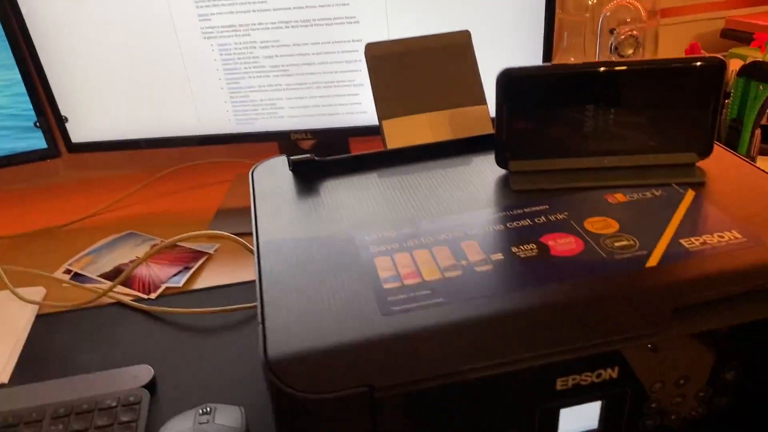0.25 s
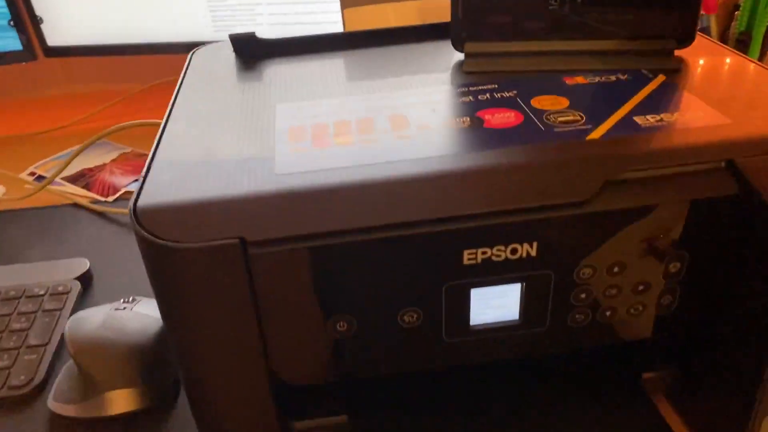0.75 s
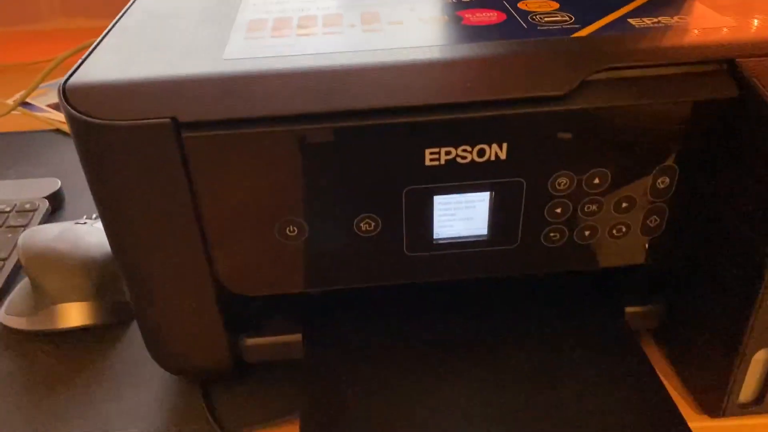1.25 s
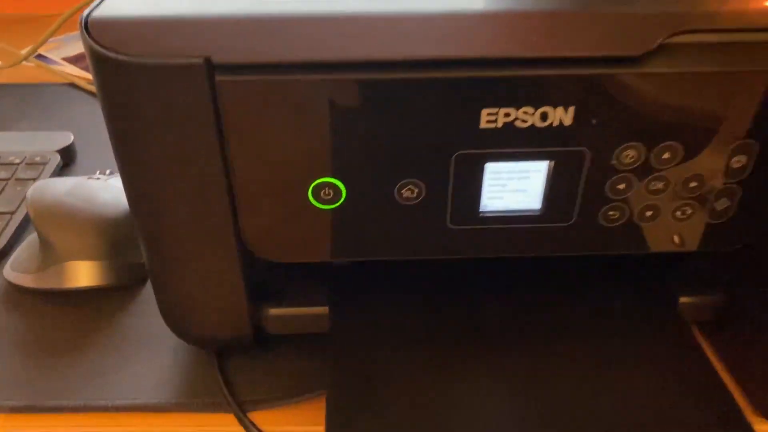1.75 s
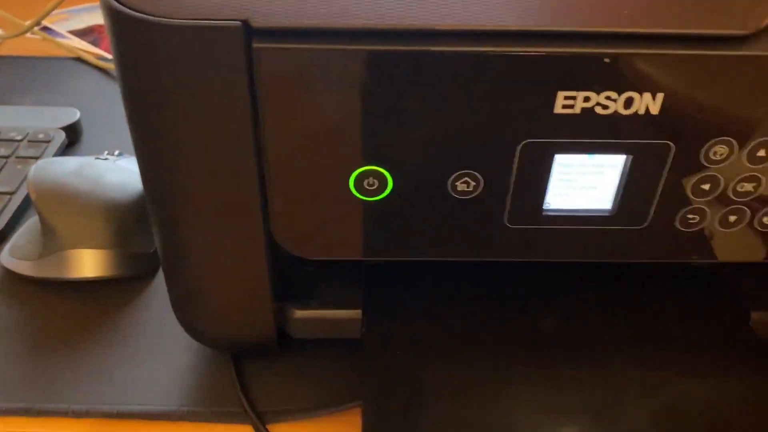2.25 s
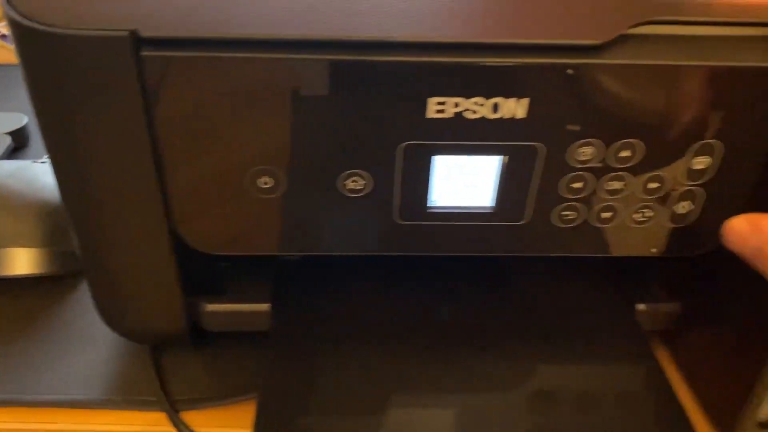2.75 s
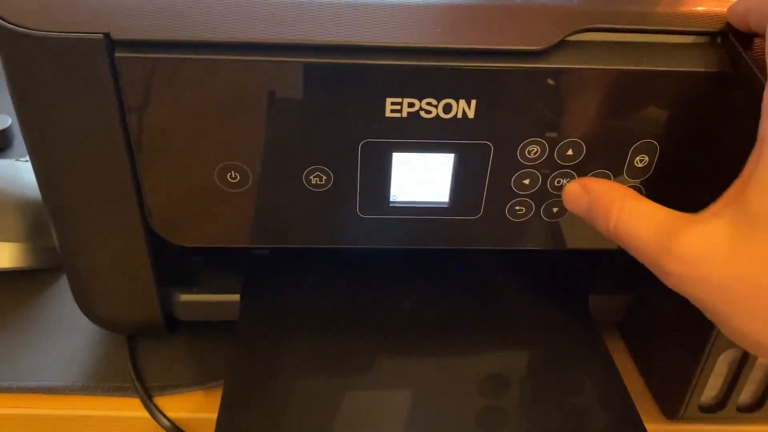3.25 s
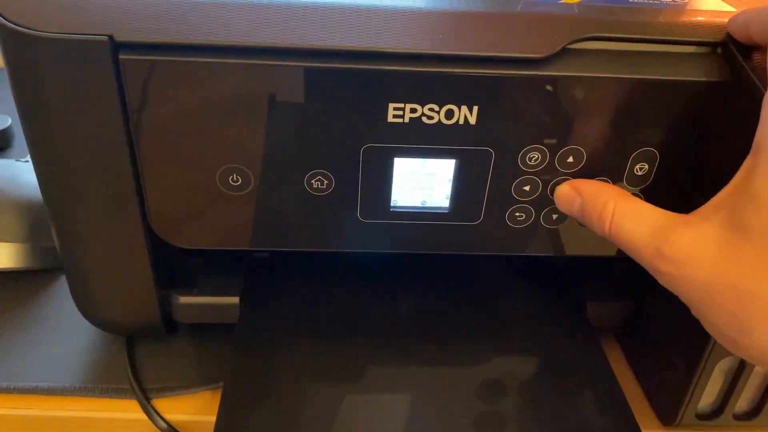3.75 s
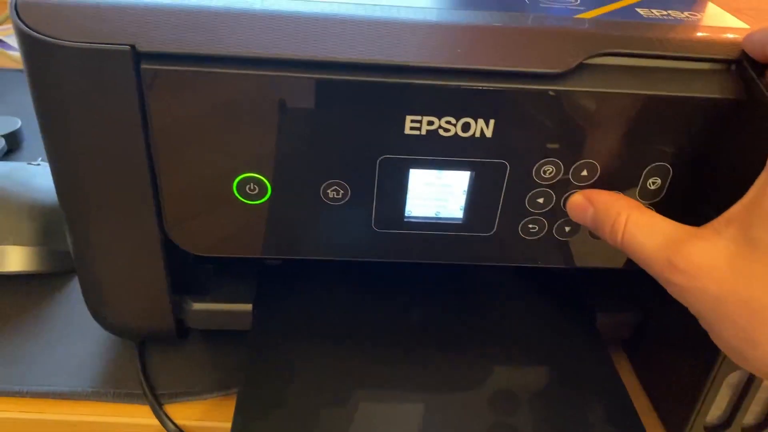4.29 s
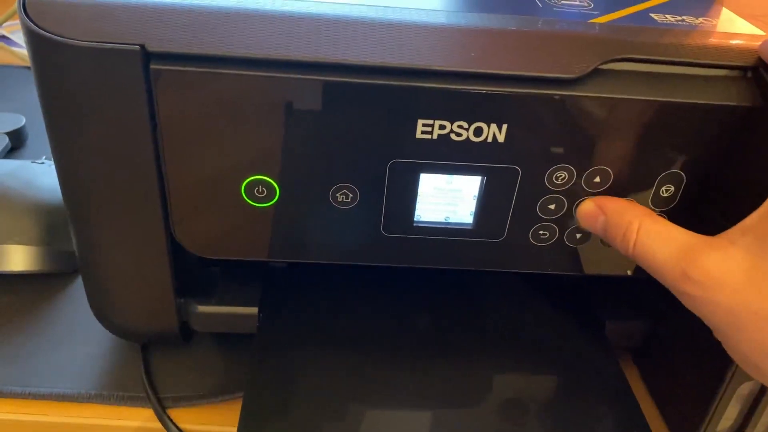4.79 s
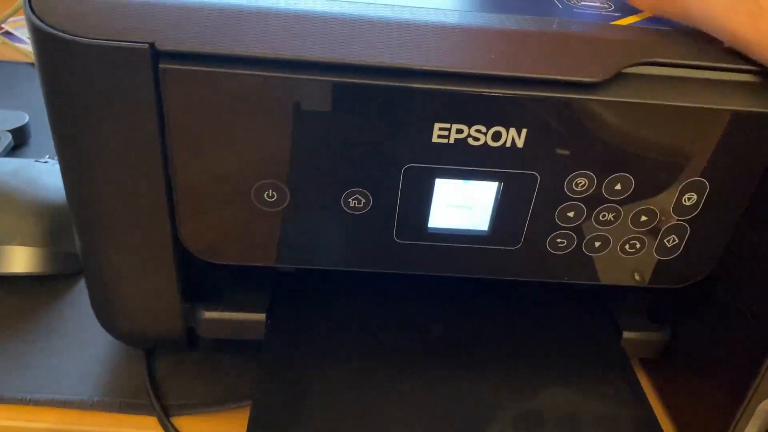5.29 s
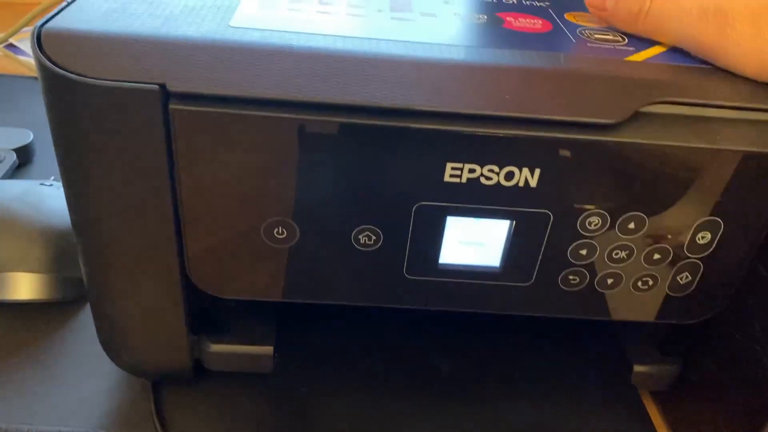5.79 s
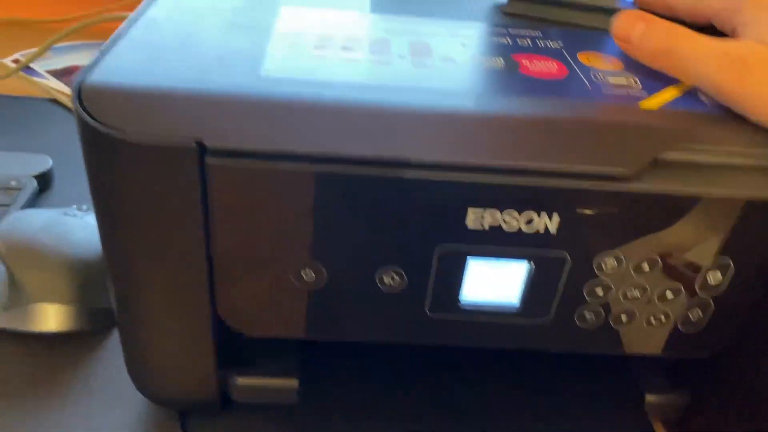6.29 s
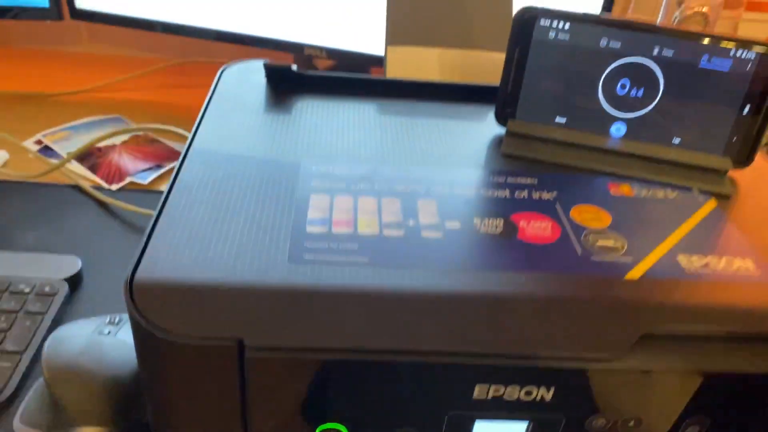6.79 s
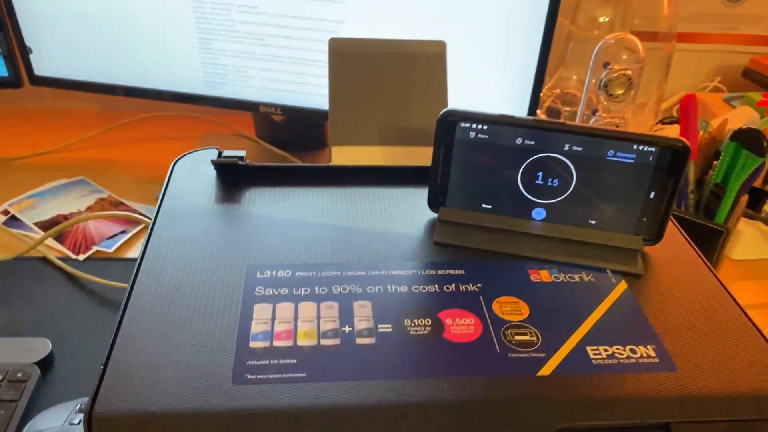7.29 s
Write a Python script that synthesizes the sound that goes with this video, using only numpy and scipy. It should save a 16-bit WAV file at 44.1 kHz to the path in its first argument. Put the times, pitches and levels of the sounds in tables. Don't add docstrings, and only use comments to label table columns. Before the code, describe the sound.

A hand-held phone microphone near a printer catches three bursts of mechanism noise separated by calm. The first is a short hollow rattle; then soft sleeve brushing and snapping panel buttons. The second opens with a hard latch crack and fades through gear grind into a faint very high whine. Finally a low whir rises and heavy plastic knocks, bright cracks and scraping crowd together. Low fan-like hum throughout, short dry room echo.

```python
import sys
import numpy as np
from scipy import signal
from scipy.fft import rfft, irfft
from scipy.io import wavfile

SR = 44100
rng = np.random.default_rng(int(sys.argv[2]) if len(sys.argv) > 2 else 0)


def voltage_ratio(level):
    return 10 ** (np.asarray(level, float) / 20)


def put_to_file(sound):
    columns = np.atleast_2d(sound).T
    safe = np.clip(columns, -1, 1)
    whole_steps = np.round(safe * 32767)
    wavfile.write(sys.argv[1], SR, whole_steps.astype(np.int16))


N = 332514
HZ = np.fft.rfftfreq(N, 1 / SR)

# (frequency [Hz], width [Hz], level [dB])
CASE_MODES = [(289.6, 24, 13.5), (385, 28, 8.5), (565, 66, 13), (700, 76, 13.5), (748, 49, 8),
              (1073, 40, 7.5), (1290, 42, 10), (1750, 40, 1.5), (1975, 29, 1.5), (2400, 66, -5),
              (2860, 49, -7.5), (3230, 58, -6), (3480, 70, -6.5)]


def read(points, hz):
    f, value = np.transpose(points)
    return np.interp(np.log(hz + 1), np.log(f + 1), value)


def evened(x):
    return x / np.sqrt(np.mean(x ** 2) + 1e-20)


def coloured(x, points):
    return evened(irfft(rfft(x) * voltage_ratio(read(points, HZ)), N))


def resonate(x, hz, width):
    return signal.lfilter(*signal.iirpeak(hz, hz / width, SR), x)


def dulled(x, hz):
    return signal.lfilter(*signal.butter(2, hz, fs=SR), x)


def impacts(per_s, spread_db):
    size = voltage_ratio(spread_db * np.minimum(rng.exponential(1, N), 4))
    struck = rng.random(N) < per_s / SR
    return evened(size * rng.standard_normal(N) * struck)


def stroke_gain(rows, rise, sag, release, column=2):
    t = np.arange(0, N, 16) / SR
    gain = 0
    for row in rows:
        start, length, db = row[:3]
        if column > 2:
            db = db + row[column]
        age = t - start
        fall = sag * np.clip(age, 0, length) + release * np.maximum(age - length, 0)
        gain = gain + voltage_ratio(db - fall) * np.clip(1 + age / rise, 0, 1) ** 2
    return np.interp(np.arange(N) / SR, t, gain)


def add(mix, s, sound):
    part = mix[round(s * SR):][:len(sound)]
    part += sound[:len(part)]


def gears():
    # (start [s], length [s], case rumble [dB], boom over it [dB], grit over it [dB])
    runs = [
        (.73, 0.13, -66.5, 4, 1.5),
        (.87, 0.2, -63, 4, 0.5),
        (5.34, 0.33, -72.5, 10, 3),
        (6.748, 0.3, -55.5, 0, -1),
    ]
    # (start [s], length [s], case rumble [dB], boom over it [dB], grit over it [dB])
    rattles = [(.63, 0.057, -46.5, 4.5, -4.5), (1.03, 0.15, -40.5, -8.5, -8), (1.19, 0.017, -48, 5, -21),
               (4.998, 0.12, -39, -4, -8.5), (5.19, 0.17, -56.5, -3, -7), (5.25, 0.019, -45, 6, -2),
               (5.63, 0.026, -62, 10, -29.5), (7.076, 0.012, -37.5, -14.5, -1.5), (7.112, 0.056, -38, 1, 0),
               (7.19, 0.2, -36, -12, -10.5), (7.278, 0.085, -34, -3.5, 0.5), (7.395, .16, -35.5, -6, -8.5)]
    load_sags = (37.2, 25, 70, 80)
    load_releases = (260, 195, 343, 400)
    # (frequency [Hz], density [dB per Hz])
    grit_colour = [(1400, -3.5), (2100, -6.5), (3300, -8), (5000, -10), (7200, -15), (9000, -13.5),
                   (16000, -39)]
    # (frequency [Hz], density [dB per Hz])
    fizz_colour = [(7500, -39), (8500, 1), (10000, -5.5), (12000, -3.5), (14500, -1.5), (16000, -15.5)]

    teeth = impacts(per_s=2600, spread_db=2.0)
    case = 0
    for hz, width, db in CASE_MODES[1:]:
        case = case + voltage_ratio(db) * resonate(teeth * rng.standard_normal(N), hz, 0.74 * width)
    case = dulled(evened(case) + 0.62 * evened(resonate(teeth, 824, 1360)), 1900)
    boom = resonate(resonate(teeth, 293.0, 138), 230, 330)
    boom = boom + 0.8 * resonate(resonate(teeth, 108, 26), 110, 42.5)
    grit = coloured(impacts(per_s=5000, spread_db=0.5), grit_colour)
    fizz = coloured(impacts(per_s=6000, spread_db=-1.0), fizz_colour)

    # (sound, level column, level when free [dB], level under load [dB]); fizz counts from the grit
    layers = [(evened(case), 2, 0, 0), (evened(boom), 3, 0, 0), (grit, 4, 0, 0), (fizz, 4, -8, -17)]
    out = np.zeros(N)
    for (layer, column, free_db, load_db), sag, release in zip(layers, load_sags, load_releases):
        free = stroke_gain(runs, rise=0.017, sag=1.9, release=440, column=column)
        loaded = stroke_gain(rattles, rise=0.005, sag=sag, release=release, column=column)
        out += layer * (voltage_ratio(free_db) * free + voltage_ratio(load_db) * loaded)
    return voltage_ratio(-3.5) * out


def treble(length, decay, rise, top_hz):
    t = np.arange(length) / SR
    band = signal.butter(1, [2200, top_hz], "bandpass", fs=SR, output="sos")
    noise = signal.sosfilt(band, rng.standard_normal(length))
    return noise * np.exp(-t / decay) * np.minimum(t / rise, 1)


def knocks():
    # (time [s], peak [dB], pitch [Hz], treble over it [dB])
    snaps = [
        (.651, -34, 640, -10),
        (4.993, -15.5, 1018, -11),
        (2.155, -59, 1490, -3.5),
        (4.932, -38.5, 694, -7),
        (5.182, -49, 1000, -22),
        (5.639, -40, 427, -24.5),
        (7.115, -23, 1290, 9.5),
        (7.304, -25.5, 670, 5),
        (7.523, -30, 535, -2.5),
    ]
    # (time [s], peak [dB], pitch [Hz], treble over it [dB])
    taps = [(.626, -35.5, 425, -11), (1.0255, -21, 1281, -6), (1.0705, -28, 1280, -0.5),
            (1.109, -36, 533, -8), (1.226, -40.5, 797, -6.5), (5.039, -25, 1274, -14),
            (5.276, -34.5, 500, -19), (5.587, -42, 800, -18), (5.649, -43, 798, -15),
            (6.748, -66.5, 614, -24), (7.0735, -20, 596, -17.5), (7.104, -22, 1290, -38),
            (7.118, -21, 665, -1.5), (7.275, -23, 775, -30), (7.291, -23, 1190, -14),
            (7.314, -27, 1080, -1), (7.422, -34, 540, -21)]
    # (time [s], peak [dB], pitch [Hz], treble over it [dB])
    jams = [
        (1.195, -35, 1060, -21),
        (5.077, -33, 1150, -7),
        (7.073, -25.5, 1180, -9),
        (7.143, -17.5, 1290, -9.5),
        (7.176, -27, 725, -4.5),
        (7.355, -24, 1290, 1),
        (7.377, -36.5, 560, 5),
    ]
    # (time [s], peak [dB], pitch [Hz], treble over it [dB])
    shoves = [(.662, -34.5, 282, -24), (.689, -36, 256, -19), (.704, -72, 225, -30), (3.308, -51, 264, -36),
              (5.157, -35, 893, -15.5), (5.238, -37, 1260, -19.5), (5.261, -30, 250, -13),
              (5.287, -60, 223, -21), (5.268, -30.5, 130, -40), (5.356, -43, 204, -11.5),
              (6.35, -52.5, 213, -20.5)]
    # (events, blow length [s], rise [s])
    kinds = [(snaps, 0.0056, 0.0043), (taps, 0.0095, 0.0014), (jams, 0.013, 0.0071), (shoves, 0.017, 0.0041)]

    out, t = np.zeros(N), np.arange(4000) / SR
    for rows, blow, rise in kinds:
        for s, db, hz, treble_db in rows:
            push = rng.standard_normal(len(t)) * np.exp(-t / blow) * np.minimum(t / rise, 1) ** 2
            case = 0
            for mode_hz, width, mode_db in CASE_MODES:
                struck = resonate(push, mode_hz * rng.uniform(0.9, 1.04), width)
                case = case + voltage_ratio(mode_db) * rng.normal() * struck
            own = evened(resonate(push, hz, 0.2 * hz))
            body = own + 0.56 * evened(case) + 0.57 * evened(resonate(push, 760, 1128))
            body = signal.lfilter(*signal.butter(2, 0.36 * hz, "high", fs=SR), dulled(body, 2600))
            crack = voltage_ratio(treble_db) * treble(len(t), 0.77 * blow, 0.064 * rise, top_hz=7260)
            add(out, s - .0008, voltage_ratio(db - 1.0) * (body / abs(body).max() + crack))
    return out


def whine():
    # (start [s], end [s], level [dB], tilt [dB per multiple], grip on loudest multiple [dB])
    holds = [
        (0, 0.537, -6, 0, 4),
        (5.695, 6.034, -6.5, 0.3, -19.5),
        (6.031, 6.388, 2, -0.3, -1.5),
        (6.38, 6.739, -0.6, 0.9, 1),
    ]
    partials = np.array([-104, -97, -103, -101, -95, -84.5, -95, -99])
    chop_hz, waver_db = 1440.5, 0.5

    out, multiples = np.zeros(N), np.arange(len(partials)) + 3
    for start, end, db, tilt_db, grip_db in holds:
        t = np.arange(0, end - start, 1 / SR)
        knots = t[::900]
        levels = partials + tilt_db * (multiples - multiples.mean())
        levels = levels + grip_db * (partials == partials.max())
        tone = 0
        for k, partial_db in zip(multiples, levels):
            waver = waver_db * np.interp(t, knots, rng.standard_normal(len(knots)))
            sine = np.sin(2 * np.pi * (chop_hz * k * t + rng.random()))
            tone = tone + voltage_ratio(db + partial_db + 13.5 + waver) * sine
        add(out, max(start, 0), tone * signal.windows.tukey(len(t), .02))
    return out


def whir():
    # (start [s], end [s], start pitch [Hz], end pitch [Hz], level [dB])
    whistles = [(.43, .54, 7700, 7300, -87), (.528, .63, 9900, 10080, -87), (5.3, 5.7, 6050, 6050, -79),
                (6.80, 6.91, 940, 1010, -64), (6.89, 7.04, 1005, 1000, -61), (6.81, 6.88, 1150, 1170, -65),
                (6.9, 6.94, 1650, 1655, -67), (6.83, 6.95, 1245, 1260, -64), (6.93, 7.04, 1140, 1120, -65),
                (6.84, 6.93, 2590, 2540, -69), (6.94, 7.04, 1920, 1900, -71), (6.84, 7.0, 1560, 1530, -71)]
    # (start [s], end [s], start pitch [Hz], end pitch [Hz], level [dB])
    murmurs = [
        (5.325, 5.595, 3480, 3495, -84),
        (5.32, 5.59, 4500, 4500, -85),
        (6.746, 6.85, 220, 340, -56),
        (6.9, 7.05, 260, 310, -55.5),
    ]
    # (start [s], end [s], start pitch [Hz], end pitch [Hz], level [dB])
    drones = [(.65, .74, 290, 250, -50), (1.05, 1.25, 255, 250, -53), (1.04, 1.2, 750, 745, -52),
              (1.04, 1.16, 565, 560, -51), (5.0, 5.05, 270, 268, -48), (5.06, 5.21, 385, 378, -47),
              (5.03, 5.16, 705, 700, -50), (7.075, 7.19, 1290, 1290, -43), (7.1, 7.25, 300, 290, -44),
              (7.285, 7.325, 290, 290, -37), (7.3, 7.42, 102, 102, -47), (7.34, 7.4, 300, 300, -45),
              (7.37, 7.54, 560, 555, -44), (7.4, 7.54, 1050, 1100, -50), (7.2, 7.26, 1650, 1650, -55)]

    out = np.zeros(N)
    for rows, width in [(whistles, 22), (murmurs, 140), (drones, 35)]:
        r = np.exp(-np.pi * width / SR)
        for start, end, from_hz, to_hz, db in rows:
            n = round((end - start) * SR)
            slow = signal.lfilter([1], [1, -r], rng.standard_normal((2, SR // 2)))
            slow = evened(slow[:, -n:])
            carrier = np.exp(2j * np.pi * np.cumsum(np.linspace(from_hz, to_hz, n)) / SR)
            tone = ((2.0 + slow[0] + 1j * slow[1]) * carrier).real
            add(out, start, voltage_ratio(db) * evened(tone) * signal.windows.tukey(n, .3))
    return out


def keys():
    # (time [s], peak [dB], pitch [Hz], treble over it [dB], ring [dB])
    clicks = [
        (2.607, -40, 1310, -13, -10.5),
        (3.548, -46, 1240, -15.5, 4),
        (3.6256, -18, 1274, -20.5, -14),
        (3.741, -27, 1140, -41, -5),
        (4.807, -22, 1290, -19, -11),
        (4.914, -26.5, 1130, -30, -5),
    ]
    # (frequency [Hz], level [dB], t60 [s])
    panel = [(294, 5, 0.036), (642, 6.5, 0.15), (897, 8.5, 0.065), (1060, -10.5, 0.034), (1290, -6, 0.1),
             (1490, -1.5, 0.032), (1656, -14, 0.055), (2100, -3.5, 0.03), (2740, -13, 0.023),
             (3460, -21, 0.03)]

    out, t = np.zeros(N), np.arange(5000) / SR
    for s, db, hz, treble_db, ring_db in clicks:
        snap = np.exp(-((t - .0016) / 0.00059) ** 2) * np.cos(2 * np.pi * hz * (t - .0017))
        shake = snap + 0.49 * rng.standard_normal(len(t)) * np.exp(-t / 0.0066) * (t > .001)
        ring = 0
        for k, (mode_hz, mode_db, t60) in enumerate(panel):
            ring = ring + (-1) ** k * voltage_ratio(mode_db) * evened(resonate(shake, mode_hz, 3.5 / t60))
        spike = np.exp(-((t - .0015) / .00004) ** 2) - np.exp(-((t - .0015) / .00012) ** 2) / 3
        tick = treble(len(t), 0.0021, 0.0008, top_hz=13000) + 0.9 * spike
        click = snap + voltage_ratio(ring_db) * ring / abs(ring).max() + voltage_ratio(treble_db + 8.0) * tick
        add(out, s, voltage_ratio(db + 2.0) * click)
    return out


def ticks():
    # (time [s], peak [dB], pitch [Hz], ring [s])
    slips = [(.632, -41, 3310, 0.0096), (0.852, -50.5, 1290, 0.042), (1.027, -22, 565, 0.028),
             (1.028, -22, 2550, 0.023), (1.076, -47, 3370, 0.018), (1.205, -25.5, 1050, 0.03),
             (2.560, -52, 900, 0.012), (2.607, -41, 2680, 0.0056), (2.608, -47, 1040, 0.061),
             (3.098, -52.5, 620, 0.083), (3.098, -52.5, 970, 0.021), (3.548, -44, 3320, 0.011),
             (3.578, -48, 700, 0.018), (4.980, -51.5, 4300, 0.0056), (5.079, -29.5, 3410, 0.0093),
             (5.178, -31, 1040, 0.027), (5.443, -45.5, 1310, 0.035), (5.567, -51, 765, 0.014),
             (6.032, -72.5, 10100, .01), (6.238, -60, 1160, 0.016), (6.354, -68, 3300, 0.0081),
             (6.475, -58.5, 1940, 0.032), (6.589, -56, 1830, 0.01), (7.146, -22.5, 3240, 0.021),
             (.63, -38, 2250, .02), (.651, -35, 1820, .02), (.652, -39, 3300, 0.017),
             (.69, -41, 1900, .015), (.918, -56, 1690, .02), (1.071, -37, 1910, .025),
             (1.071, -43, 4700, .02), (1.073, -37, 3540, .025), (1.11, -39, 3000, .012),
             (1.222, -53, 3600, .015), (1.64, -45, 170, 0.095), (1.85, -50, 222, .12),
             (2.37, -51, 217, .08), (2.565, -48.5, 230, 0.075), (2.645, -48, 220, .07),
             (3.312, -49.5, 600, 0.041), (6.36, -59, 716, 0.034), (6.815, -55, 2900, .015),
             (7.113, -25, 4800, 0.017), (7.171, -36, 9500, .015), (7.304, -24, 2400, 0.027),
             (7.354, -34, 2120, .02), (7.45, -31, 570, 0.067), (7.52, -28, 570, .05)]
    out, t = np.zeros(N), np.arange(3000) / SR
    for s, db, hz, ring in slips:
        slip = dulled(rng.standard_normal(len(t)) * np.exp(-t / .002), 1.5 * hz)
        ping = evened(resonate(slip, hz, 3.5 / ring))
        part = ping + 0.35 * evened(resonate(slip, hz, 1.1 * hz))
        add(out, s, voltage_ratio(db) * part / abs(part).max())
    return out


def brush():
    # (start [s], length [s], hiss [dB], rub over it [dB])
    strokes = [(.46, 0.059, -86, 16), (.56, 0.086, -78, 13.5), (1.7, 0.2, -91, 27),
               (2.37, 0.086, -82.5, 13.5), (2.78, 0.16, -71.5, 1), (3.135, 0.06, -70.5, -8),
               (3.25, 0.079, -67.5, -15), (5.13, 0.095, -74, 6), (5.43, 0.055, -69.5, -14.5),
               (6.46, 0.046, -84, 22), (6.56, 0.042, -76.5, 10.5)]
    # (start [s], length [s], hiss [dB], rub over it
    # [dB])
    slides = [
        (1.24, 0.2, -76, 22),
        (2.62, 0.065, -81.5, 21.7),
        (3.645, 0.088, -69, 15.4),
        (4.825, 0.079, -73, 13),
    ]
    # (frequency [Hz], density [dB per Hz])
    cloth = [(880, -34), (1500, -10), (3480, -5), (4200, -6.5), (5280, -3.5), (6370, -7), (8490, -3.5),
             (9950, -3), (12200, -6.5), (16000, -3.5)]

    hiss = coloured(impacts(per_s=29000, spread_db=-1.0), cloth)
    rub = evened(dulled(resonate(impacts(per_s=4600, spread_db=4.0), 600, 1300), 2000))
    sleeve_hiss, sleeve_rub = [stroke_gain(strokes, rise=0.079, sag=20, release=390, column=k) for k in (2, 3)]
    thumb_hiss, thumb_rub = [stroke_gain(slides, rise=0.0042, sag=170, release=1600, column=k) for k in (2, 3)]
    hissing = sleeve_hiss * hiss + thumb_hiss * evened(dulled(hiss, 8000))
    return voltage_ratio(4.0) * hissing + voltage_ratio(-5.0) * (sleeve_rub + thumb_rub) * rub


def rustle():
    # (start [s], length [s], centre [Hz], width [Hz], level [dB])
    drags = [
        (1.697, .22, 6400, 2400, -85.5),
        (2.15, .3, 4600, 1190, -93),
        (6.453, 0.19, 3700, 900, -80.5),
        (7.2, 0.099, 2150, 800, -51),
        (7.319, 0.097, 4270, 1600, -47),
        (7.424, 0.11, 1920, 910, -54),
        (0.626, 0.083, 2600, 2000, -60),
    ]
    out = np.zeros(N)
    for start, length, hz, width, db in drags:
        drag = resonate(resonate(rng.standard_normal(SR // 2), hz, width), hz, width)
        drag = drag[:round(length * SR)]
        add(out, start, voltage_ratio(db) * evened(drag) * signal.windows.tukey(len(drag), .5))
    return out


def scatter():
    spectrum = rfft(rng.standard_normal(512) * np.exp(-np.arange(512) / 60.))
    return irfft(spectrum / abs(spectrum))


def tail():
    # (frequency [Hz], t60 [s])
    decay = [(150, 0.17), (600, 0.22), (1500, 0.2), (4000, 0.099), (12000, 0.063)]
    taps = rng.choice([-1., 1.], SR // 3) * (rng.random(SR // 3) < .06)
    hz, t, z = signal.stft(taps, SR, nperseg=128)
    t60 = read(decay, hz)[:, None]
    out = signal.istft(z * voltage_ratio(-60 * t / t60) / np.sqrt(t60), SR, nperseg=128)[1]
    return np.r_[np.zeros(150), out] / np.linalg.norm(out)


def drifting(x, response):
    drift = 2 * np.pi * 1.7 * np.arange(N) / SR
    return sum(signal.oaconvolve(x * turn(drift), response())[:N] for turn in (np.sin, np.cos))


def ports(x, other, column):
    # (frequency [Hz], left over right [dB], likeness of near sounds [0-1], likeness of the hum [0-1])
    balance = np.array([(0, 0.6, 0.92, 0.98), (164, -0.4, 1, 0.88), (360, 1, 0.85, 0.59),
                        (1000, 0.9, 0.57, .4), (1670, 1.5, 0.45, 0.11), (3000, 3.5, 0.351, 0.072),
                        (4730, 4.5, 0.14, 0.085), (6100, 1.5, 0.2, 0.29), (7600, 3.5, 0.53, 0.27),
                        (8200, 1, 0.75, 0.2), (9800, -2, 1, 0.58), (11940, 1.5, 0.99, .92),
                        (14500, -1, 0.79, 0.4)])
    # (frequency [Hz], lead [rad])
    right_lead = [(0, 0), (3100, -.6), (6500, 0), (8550, 3.14), (10200, 6.25), (12350, 9.42), (14200, 12.6),
                  (16000, 15.6)]
    left_db = np.interp(HZ, balance[:, 0], balance[:, 1])
    same = np.clip(np.interp(HZ, balance[:, 0], balance[:, column]), 0, 1)
    lead = np.interp(HZ, *np.transpose(right_lead))
    shared = rfft(x) * np.sqrt((1 + same) / 2)
    apart = rfft(other) * np.sqrt((1 - same) / 2)
    left = (shared + apart) * voltage_ratio(left_db / 2)
    right = (shared - apart) * voltage_ratio(-left_db / 2) * np.exp(1j * lead)
    return irfft([left, right], N)


def hum():
    # (frequency [Hz], density [dB per Hz])
    room_colour = [(12, -46.5), (20, -25.5), (53, 2.5), (163, -23), (198, -9.5), (228, -18), (255, -6.5),
                   (310, -13), (377, -9), (513, -18.5), (590, -15), (976, -26), (1860, -35), (2460, -38.5),
                   (16000, -53.5)]
    # (frequency [Hz], width [Hz], level [dB])
    fans = [(50.3, 42.5, -64), (110.6, 17, -70.5), (193.2, 25.5, -67), (374.4, 17, -75.5),
            (1866, 270, -81.5), (2600, 20, -99)]
    swells_per_s, swell_db = 2.5, 0.78

    noise = rng.standard_normal((2, N))
    bed = np.array([coloured(n, room_colour) for n in noise]) * voltage_ratio(-65.0)
    for hz, width, db in fans:
        band = resonate(rng.standard_normal((2, N)), hz, width)
        bed += voltage_ratio(db) * evened(resonate(band, hz, 6.3 * width))
    slow = np.exp(-(HZ / swells_per_s) ** 2) * (HZ > 0)
    swell = evened(irfft(rfft(rng.standard_normal(N)) * slow, N))
    return ports(*(bed * voltage_ratio(2.0 + swell_db * swell)), column=3)


def scene():
    near = gears() + knocks() + whir() + keys() + ticks() + brush()
    direct = ports(near + whine(), drifting(near, scatter), column=2)
    far = dulled(near, 6340)
    room = ports(drifting(far, tail), drifting(far, tail), column=2)
    lid = rustle() * voltage_ratio(np.array([[2.5], [-2.5]]))
    return direct + lid + voltage_ratio(-9.0) * room + hum()


def band_limit(x):
    return signal.sosfilt(signal.butter(12, 16490, fs=SR, output="sos"), x)


def record(dry):
    edge = voltage_ratio(-22 * np.clip((HZ - 15200) / 350, 0, 1.5))
    return band_limit(irfft(rfft(dry) * edge, N))


dry = scene()
out = record(dry)
put_to_file(out)
```